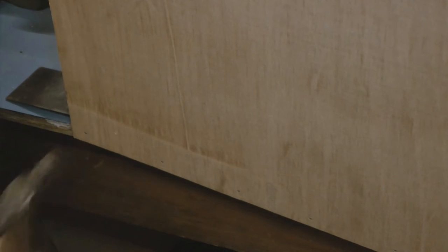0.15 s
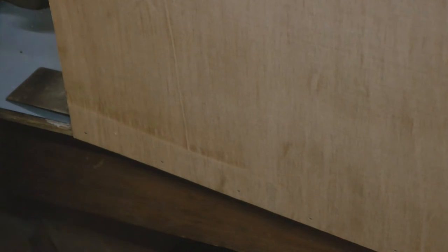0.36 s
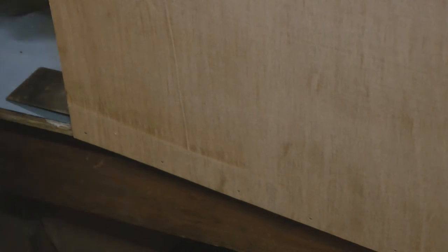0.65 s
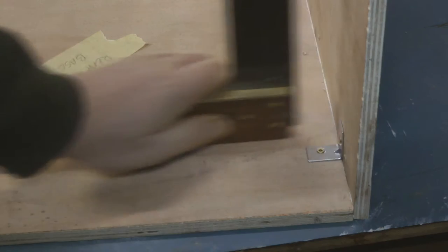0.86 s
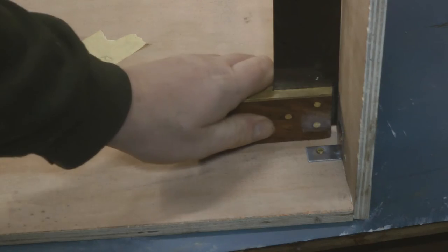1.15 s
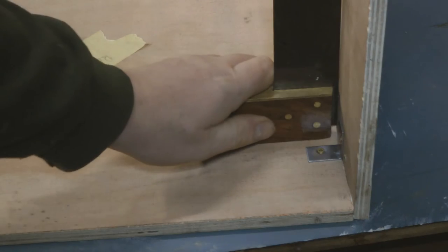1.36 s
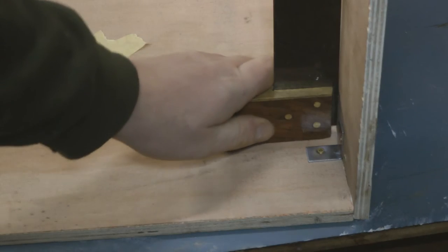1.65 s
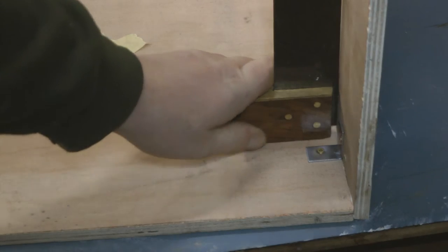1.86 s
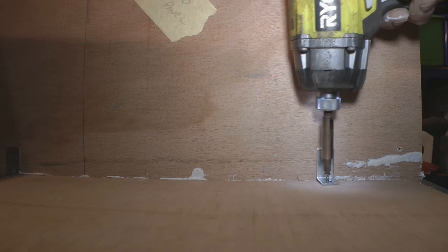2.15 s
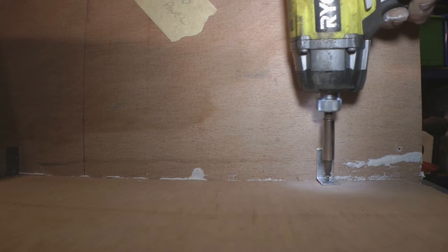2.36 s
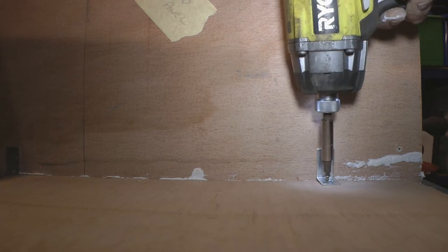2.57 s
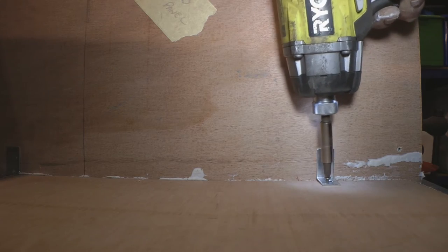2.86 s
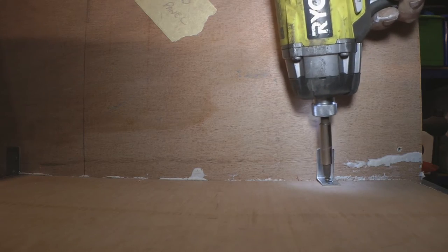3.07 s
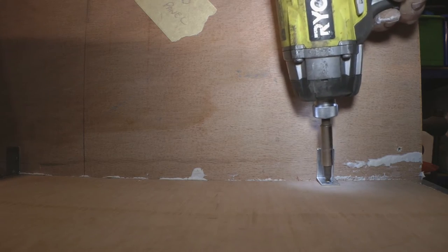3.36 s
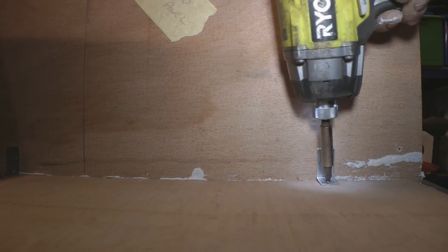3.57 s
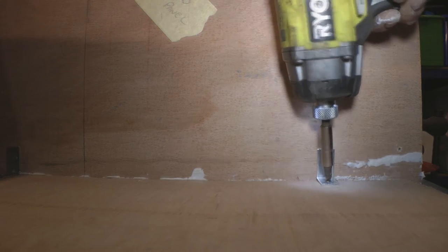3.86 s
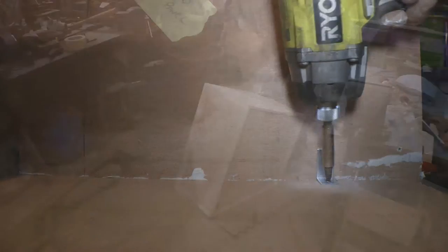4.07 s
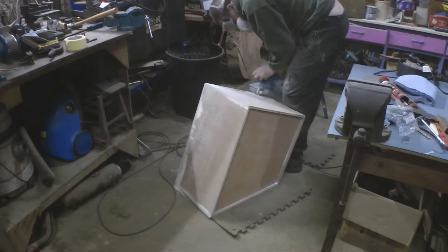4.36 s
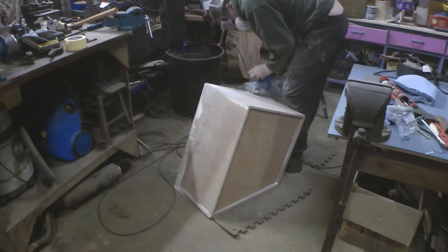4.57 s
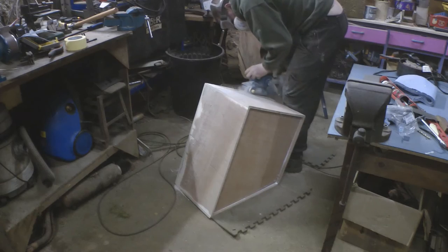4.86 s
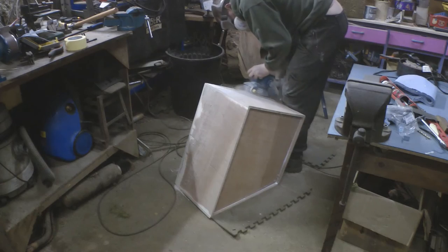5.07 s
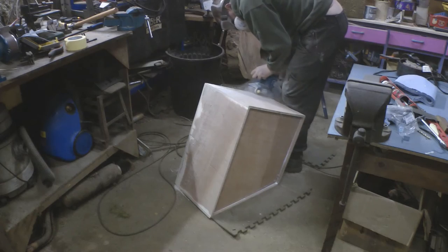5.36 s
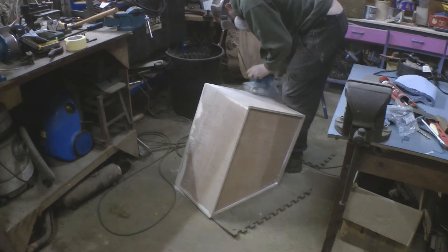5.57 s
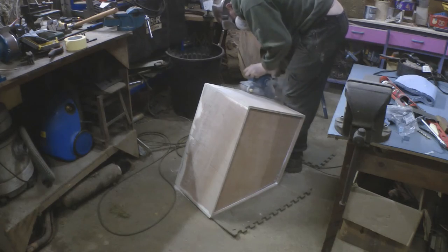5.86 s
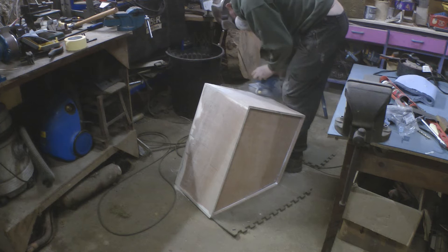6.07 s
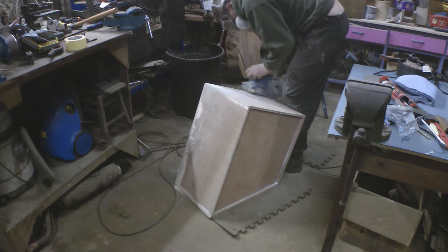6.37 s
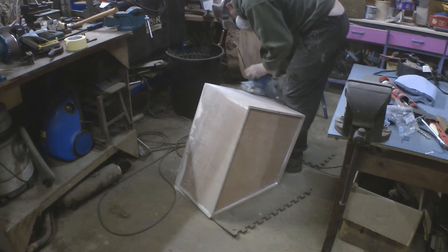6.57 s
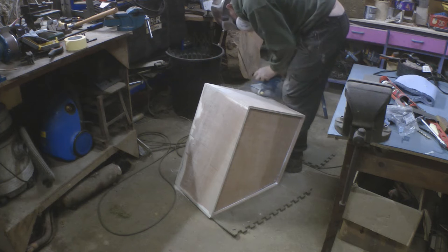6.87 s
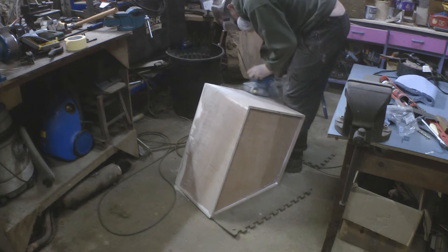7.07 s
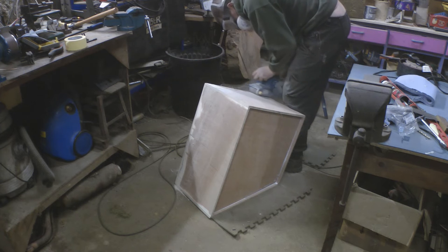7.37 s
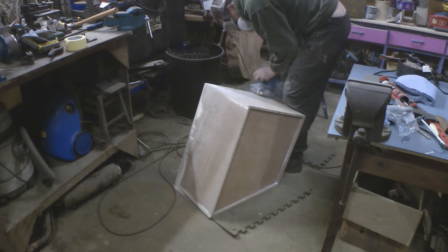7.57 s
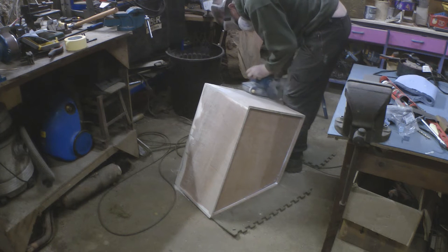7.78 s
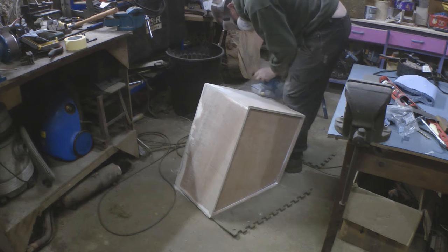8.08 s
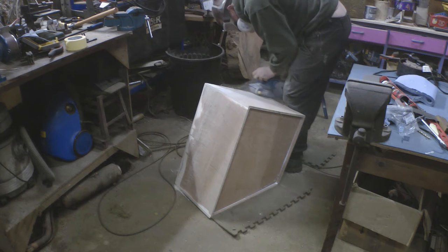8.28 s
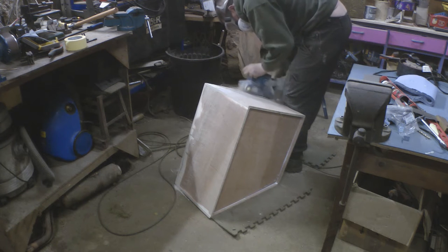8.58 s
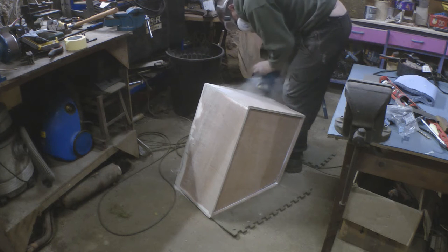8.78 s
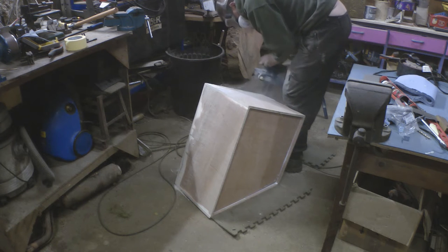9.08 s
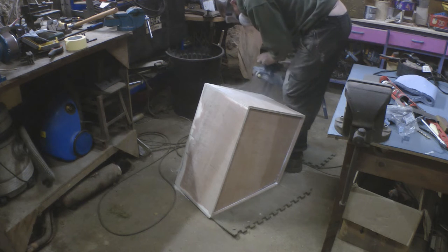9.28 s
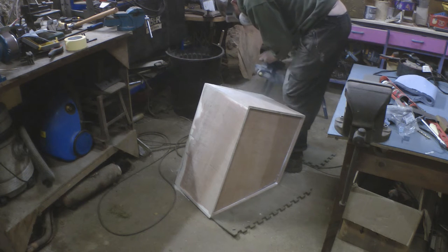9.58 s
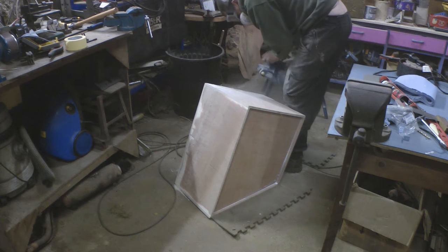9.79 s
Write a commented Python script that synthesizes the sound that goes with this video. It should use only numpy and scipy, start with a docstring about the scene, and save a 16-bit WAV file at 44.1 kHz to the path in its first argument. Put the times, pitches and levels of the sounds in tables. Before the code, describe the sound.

Two hammer blows on plywood among dry scrapes, then a cordless driver whirs and rattles, then a loud belt sander grinds, races and sinks.

```python
"""Plywood box building

In a small, cluttered workshop two hammer blows fall among scrapes: clicks excite decaying modes, noise slides.
A cordless driver grinds a screw home with gear noise, a rattling bit and a singing speed controller.
A belt sander works an edge, races free when lifted off and at the end is heard coasting, its pitch sinking:
its motor speed sets every tone."""
import sys
import numpy as np
from scipy import signal
from scipy.fft import rfft, irfft, next_fast_len
from scipy.io import wavfile

SR = 44100
rng = np.random.default_rng(int(sys.argv[2]) if len(sys.argv) > 2 else 0)


def digitize_waveform(pressure):
    """Quantize a signal to 16-bit integers and store it at the path in sys.argv[1].

    Rows of a 2-D input are taken as channels; values are limited to [-1, 1].
    """
    field = np.atleast_2d(pressure).T
    bounded = np.clip(field, -1, 1)
    quanta = np.round(bounded * 32767).astype(np.int16)
    wavfile.write(sys.argv[1], SR, quanta)


N = 437463
TIME = np.arange(N) / SR

# modes of the screw and bracket: (frequency [Hz], level [dB], t60 [s])
BIT_MODES = [(751, -7, 0.026), (1850, -4, 0.0057), (2254, -10, 0.011), (3090, 5, 0.007),
             (3700, 1.5, 0.0066), (3980, 3, 0.003)]
# modes of the box panels under the driver: (frequency [Hz], level [dB], t60 [s])
PANEL_MODES = [(112, -6, 0.4), (164, 0, 0.14), (202, 3, 0.11), (236, 4, 0.1), (285, -2, .07),
               (371, -12, 0.039)]
# modes of the box under the sander: (frequency [Hz], level [dB], t60 [s])
BOX_MODES = [(318, 4, 0.24), (372, 1, 0.09), (437, 6, 0.12), (473, 4, 0.09), (522, 3.5, 0.11),
             (821, -1, 0.12), (920, -1, 0.16), (1030, 2, 0.1)]

DRIVE_ATTACK_S, DRIVE_RELEASE_S = 0.028, 0.006
# the sander starts, meets the wood and is lifted off; from COASTING_S on it is heard already coasting
START_S, TOUCH_S, LIFT_S, COASTING_S = 4.105, 4.15, 8.81, 9.58


def from_db(db):
    """Logarithmic level: decibels to an amplitude ratio."""
    return 10 ** (np.asarray(db) / 20)


def rms_one(x):
    """Normalisation: the mean of the channels gets an rms of 1."""
    return x / np.sqrt(np.mean(np.atleast_2d(x).mean(axis=0) ** 2) + 1e-20)


def in_time(rows):
    """Linear interpolation: every column of a curve, sample by sample."""
    s, *columns = np.transpose(rows)
    return [np.interp(TIME, s, c) for c in columns]


def at_hz(points, hz):
    """Interpolation over log frequency: every column of a spectrum at the given frequencies."""
    f, *columns = np.transpose(points)
    return [np.interp(np.log(hz + 1), np.log(f), c) for c in columns]


def drift(rate_hz):
    """Low-passed random fluctuation: two equal real poles at rate_hz, rms 1."""
    step = 40  # samples between the points of the slow curve
    r = np.exp(-2 * np.pi * rate_hz * step / SR)
    slow = signal.lfilter([1], [1, -2 * r, r * r], rng.standard_normal(N // step + 2002))
    slow = rms_one(slow[2000:])  # the filter has settled by here
    return np.interp(np.arange(N) / step, np.arange(len(slow)), slow)


def pan(db):
    """Intensity stereo: left and right gains for a level difference, left minus right."""
    gains = from_db([[db / 2], [-db / 2]])
    return gains / gains.mean()


def noise(colour):
    """Partial coherence: coloured noise, mostly leaning right, whose channels are alike by frequency."""
    # across the two microphones: (frequency [Hz], left minus right [dB], likeness [0-1], phase [rad])
    stereo = [(60, 1, 0.81, -4), (160, 0.5, 0.45, 1.8), (310, -7.5, 0.9, -3.5), (564, -9, 0.94, -3.5),
              (1170, -5.5, 0.38, -5), (2270, -10, 0.48, -5.5), (4900, -16.5, 0.1, -5.5),
              (7940, -3.5, 0.14, -5.5), (14100, -15.5, 0.22, -31)]
    size = next_fast_len(N, real=True)
    hz = np.linspace(0, SR / 2, size // 2 + 1)
    lean_db, alike, turn = at_hz(stereo, hz)
    alike = np.clip(alike, 0, .98)
    mid, side = rfft(rng.standard_normal((2, size)))
    sides = np.array([[1], [-1]])
    pair = np.sqrt(1 + alike) * mid + sides * np.sqrt(1 - alike) * side
    pair = pair * from_db(sides * lean_db / 2)
    pair[0] *= np.exp(1j * turn)
    # the amplitude of the two channels' sum, divided out so that the colour holds at the centre
    centre = np.sqrt(from_db(lean_db) + from_db(-lean_db) + 2 * alike * np.cos(turn))
    return rms_one(irfft(pair / centre * from_db(at_hz(colour, hz)[0]))[:, :N])


def ring(clicks, modes):
    """Modal superposition: clicks excite a body's exponentially decaying resonances."""
    out = 0
    for hz, db, t60 in modes:
        r = from_db(-60 / (t60 * SR))  # decay per sample
        w = 2 * np.pi * hz / SR
        resonance = signal.lfilter([0, np.sin(w)], [1, -2 * r * np.cos(w), r * r], clicks + 1e-18)
        out = out + from_db(db) * resonance
    return out


def strike(s, db):
    """Impulsive force: one click."""
    click = np.zeros(N)
    click[round(s * SR)] = from_db(db)
    return click


def cut(x, hz, kind):
    """Second-order filtering: a gentle low- or high-pass."""
    sos = signal.butter(2, min(hz, SR / 2.2), kind, fs=SR, output="sos")
    return signal.sosfilt(sos, x + 1e-18)


def workshop(x, wet_db, lean_db):
    """Reverberation: direct sound plus dense decaying reflections, different at each microphone."""
    room_t60_s = 0.3
    t = TIME[:SR // 2]
    echoes = rng.standard_normal((2, len(t))) * from_db(-60 * t / room_t60_s)
    echoes *= t > .003  # the first reflection comes after 3 ms
    echoes *= from_db(wet_db) / np.sqrt(np.sum(echoes ** 2, axis=1, keepdims=True))
    reflected = signal.fftconvolve(x[None], echoes, axes=1)[:, :N]
    return pan(lean_db) * (x + reflected) / np.sqrt(1 + from_db(2 * wet_db) / 2)


def phase_of(hz, jitter, rate):
    """Phase as the integral of frequency: the angle of something that turns a little unevenly."""
    return 2 * np.pi * np.cumsum(hz * (1 + jitter * drift(rate))) / SR


def gate(start, end, attack_s, release_s):
    """Envelope: straight rise, hold, exponential release."""
    return np.clip((TIME - start) / attack_s, 0, 1) * np.exp(-np.clip((TIME - end) / release_s, 0, 40))


def each_turn(turns):
    """Periodic impulses: one click whenever a turn is completed."""
    return np.diff(np.floor(turns), prepend=np.floor(turns[0]))


def shaken(modes):
    """Random forcing of resonances: steady shaking keeps a wooden body ringing; rms 1."""
    white = noise([(1, 0)])
    return rms_one(cut(ring(white, modes), 115, "high"))


def room_floor():
    """Stationary background noise: a quiet room whose level rises by 7 dB shortly before the second blow."""
    # spectrum of the room: (frequency [Hz], level [dB])
    floor_colour = [(18, -78), (30, -51), (107, -16), (216, -15.5), (253, -14), (497, -22.5), (800, -24),
                    (1100, -37), (1410, -24), (6040, -36), (15000, -39.5)]
    rise_db = np.interp(TIME, [.85, .95], [-8, -1])
    return noise(floor_colour) * from_db(-60.5 + rise_db)


def sliding(grain_db=1.7):
    """Friction noise: hand and wood rub dryly over the plywood, stroke by stroke."""
    # the strokes: (start [s], end [s], level [dB])
    strokes = [(-0.1, 0.027, -41.5), (0.136, 0.214, -50), (0.502, 0.838, -56.5), (0.873, 1.075, -36.5),
               (1.447, 1.883, -65.5), (1.83, 1.934, -52)]
    # spectrum of the rubbing: (frequency [Hz], level [dB])
    slide_colour = [(35, -14), (60, -14), (355, -3), (480, -8), (1050, -8), (1520, -7.5), (2420, 3.5),
                    (4730, -3.5), (15000, -52)]
    attack_s, release_s = 0.11, 0.058
    level = sum(from_db(db) * gate(start, end, attack_s, release_s) for start, end, db in strokes)
    return level * from_db(grain_db * drift(56)) * noise(slide_colour)


def hammer(tail_t60=0.56):
    """Impact excitation: a chattering crack, a thump of the panel, ringing boards, then the room's tail."""
    # blows: (time [s], crack [dB], thump [dB], board ring [dB], room tail [dB], tail build-up [s],
    # contact cut-off [Hz])
    blows = [(0.1095, -16, -22.5, -50, -27, 0.026, 13100), (1.0990, -7.5, -17, -32, -27.5, 0.0022, 3550)]
    # the head chatters on the wood within one blow: (delay [s], level [dB], cut-off [Hz])
    rebounds = [(.0019, -1.5, 4060), (.0066, -11.5, 4000)]
    # modes of head on wood, of the plywood panel near the blow and of the box's boards:
    # each (frequency [Hz], level [dB], t60 [s])
    crack_modes = [(835, -7.5, 0.028), (1400, -21, 0.11), (1730, -16, 0.075), (2884, 0, 0.021),
                   (3880, -2.5, 0.014), (5070, 5.5, 0.0019), (6900, 7.5, 0.0016), (10140, 5, 0.0014),
                   (14500, -1, 0.0029)]
    thump_modes = [(70, -16, 0.077), (136, -2.5, 0.021), (258, -6, 0.015), (533, 4, 0.0078)]
    board_modes = [(254, -17, 2), (366, -16, .62), (420, -7, .42), (734, 0, .5), (803, -2, .3),
                   (804, -32, 5), (1227, -7, .5), (1393, -5, .4), (1690, -4, .41), (1841, -7, .24)]
    # the room after each blow, one spectrum a blow: (frequency [Hz], density [dB per Hz])
    tail_colours = [
        [(47, -47), (80, -28), (113, 10), (231, -45), (371, 7), (471, -52), (536, -8.5), (1720, 2), (2500, 2),
         (3440, 11.5), (14000, -46)],
        [(47, -39), (80, -20), (380, -2), (560, -19), (760, -10), (930, -20), (1190, -15), (2830, -4.5),
         (4650, -21.5), (7980, -73), (14000, -68)],
    ]
    out = 0
    for blow, colour in zip(blows, tail_colours):
        s, crack_db, thump_db, ring_db, tail_db, build_s, contact_hz = blow
        click = strike(s, 0)
        age = np.maximum(TIME - s, 0)
        contacts = click + sum(cut(strike(s + delay, db), hz, "low") for delay, db, hz in rebounds)
        crack = cut(cut(ring(contacts, crack_modes), contact_hz, "low"), 730, "high")
        out = out + pan(-12.0) * from_db(crack_db) * crack
        out = out + pan(4.7) * from_db(thump_db) * ring(click, thump_modes)
        out = out + pan(-18.0) * from_db(ring_db) * ring(click, board_modes)
        tail = from_db(tail_db - 60 * age / tail_t60) * (1 - np.exp(-age / build_s))
        out = out + noise(colour) * tail
    return out


def skid(s, db, length_s):
    """Random micro-impacts: a first touch, then a dying scatter of others."""
    clicks_per_s, scatter_db = 2100, -0.5
    age = TIME - s
    touches = (rng.random(N) < clicks_per_s / SR) * (age > 0) * rng.uniform(-0.98, 1, N)
    return strike(s, db) / 2 + touches * from_db(db + scatter_db) * np.exp(-np.clip(age / length_s, 0, 40))


def bumps():
    """Impact on resonant bodies: a tool slips or lands with a skid of steel and a boom of the box."""
    # the tools bump the box and skid: (time [s], panel [dB], click [dB], decay of the skid [s])
    knocks = [(2.314, -26, -34, 0.0081), (3.882, -40, -22.5, 0.018), (3.897, -27, -18.5, 0.005),
              (3.9088, -24, -45, 0.0086), (4.203, -28, -23, 0.01)]
    boom = ring(sum(strike(s, db) for s, db, _, _ in knocks), PANEL_MODES)
    boom = cut(boom, 93, "high")
    click = ring(sum(skid(s, db, length_s) for s, _, db, length_s in knocks), BIT_MODES)
    click = cut(click, 16000, "low")
    return workshop(boom, wet_db=-1.0, lean_db=-1.0) + workshop(click, wet_db=-13.0, lean_db=-11.5)


def controller(octave_db=-47, waver_db=3.5):
    """Frequency sweep: switched current sings in the driver's windings, a chirp a pull, then a sagging tone."""
    # each trigger pull sweeps the controller up: (start [s], end [s], start [Hz], top [Hz], chirp [dB])
    pulls = [(1.963, 2.765, 4690, 5640, -28), (2.77, 3.894, 3483, 5690, -16), (4, 4.133, 5550, 5620, -62)]
    # level of the switching tone before its waver: (time [s], level [dB])
    switching = [(2.0, -43), (2.25, -34), (2.45, -45), (2.6, -49), (2.8, -40), (3.5, -42), (3.7, -41),
                 (4.05, -45.5)]
    sweep_s, sag_hz_per_s = 0.006, 89  # half the sweep is done after sweep_s
    chirp_rise_s, chirp_fall_s = .003, .007
    hz, on, chirp = np.zeros(N), 0, 0
    for s, end, start_hz, top_hz, chirp_db in pulls:
        on = on + gate(s, end, DRIVE_ATTACK_S, DRIVE_RELEASE_S)
        age = np.maximum(TIME - s, 0)
        swept = top_hz - (top_hz - start_hz) / (1 + (age / sweep_s) ** 2)
        hz = np.where(TIME >= s, swept - sag_hz_per_s * age, hz)
        chirp = chirp + from_db(chirp_db) * gate(s, s + chirp_rise_s, chirp_rise_s, chirp_fall_s)
    angle = phase_of(hz, jitter=0.0028, rate=100)
    tone = from_db(in_time(switching)[0] + waver_db * drift(44)) * np.sin(angle)
    octave = from_db(octave_db + waver_db * drift(82)) * np.sin(2 * angle)
    return pan(-12.0) * on * (tone + octave) + workshop(chirp * np.sin(angle), wet_db=-6, lean_db=-12)


def driver(clicks_per_s=480, slowing=.75, easing=0.1, rasp_db=-0.5):
    """Repeated impact and forced vibration: gears rasp, the bit rattles in the screw head, the panel rumbles."""
    # the screw goes in by stages: (start [s], end [s], gear [dB], gear loss by the stage's end [dB],
    # bit chatter [dB], panel rumble [dB])
    drives = [(1.963, 2.309, -32, 1.5, -40, -40), (2.314, 2.774, -39, -5, -44, -47),
              (2.762, 3.898, -31.5, 14, -28, -45), (3.977, 4.124, -71, 1.5, -48, -43.5)]
    # the bit rides up in the screw head and rattles in a burst: (time [s], length [s], level [dB])
    bursts = [(2.143, 0.015, -25), (2.382, 0.011, -38), (2.414, 0.014, -36), (2.461, 0.016, -31),
              (2.549, 0.032, -33), (2.594, 0.027, -34), (2.724, 0.014, -31.5), (2.78, 0.028, -26.5),
              (2.838, 0.017, -23), (2.866, 0.0079, -26), (2.91, 0.028, -33), (2.957, 0.018, -25.4),
              (2.983, 0.017, -31), (3.025, 0.01, -27), (3.083, 0.0085, -21.5), (3.109, 0.015, -21),
              (3.162, 0.015, -40), (3.191, 0.014, -30), (3.236, 0.033, -26.4), (3.309, 0.028, -25),
              (3.343, 0.02, -25.2), (3.427, 0.02, -23), (3.527, 0.021, -20), (3.588, 0.042, -26),
              (3.661, 0.029, -27.5)]
    # the bit jumps with a single sharp tick: (time [s], level before the common tick_db [dB])
    tick_times = [(2.382, -13), (2.5704, -16), (2.6818, -18), (2.8014, -13), (2.8484, -12), (2.9714, -13),
                  (3.1956, -13), (3.313, -11.5), (3.3215, -12), (3.3977, -13.5), (3.5952, -13),
                  (3.6172, -13), (3.6903, -15), (3.7044, -14), (3.7218, -19), (3.7848, -15), (3.818, -13),
                  (3.8252, -17), (3.8477, -15), (3.8699, -14), (4.013, -33)]
    # spectrum of the gears: (frequency [Hz], level [dB])
    gear_colour = [(150, -62), (370, -13), (470, -27), (620, 1), (950, -10), (1400, -5.5), (1950, -4),
                   (2250, 1.5), (2520, -6), (3080, 4.5), (3520, -1.5), (4950, 0), (6100, -13), (6800, -7),
                   (9500, -15.5), (15500, -20)]
    tick_db, surge_attack_s, surge_release_s = -8, .004, .003
    gear = chatter = rumble = drag_db = 0
    for start, end, gear_db, loss_db, chatter_db, rumble_db in drives:
        on = gate(start, end, DRIVE_ATTACK_S, DRIVE_RELEASE_S)
        tight_db = loss_db * np.clip((TIME - start) / (end - start), 0, 1) ** 2
        gear = gear + on * from_db(gear_db - tight_db)
        chatter = chatter + on * from_db(chatter_db - easing * tight_db)
        rumble = rumble + on * from_db(rumble_db)
        drag_db = drag_db + on * tight_db
    # the rattle slows where the gears lose level and quickens where they gain
    angle = phase_of(clicks_per_s * from_db(-slowing * drag_db), jitter=.2, rate=150)
    force_db = 2 * np.clip(rng.standard_normal(N), -2, 1) + 1.5 * np.minimum(drift(50), 1)
    clicks = each_turn(angle / (2 * np.pi)) * from_db(force_db)
    # every touch lands elsewhere and so shares its force among the modes anew
    rattle = sum(ring(clicks * rng.uniform(.3, 1, N), [mode]) for mode in BIT_MODES)
    rattle = rms_one(cut(cut(rattle, 2530, "high"), 3500, "low"))
    surges = sum(from_db(db) * gate(s, s + length, surge_attack_s, surge_release_s)
                 for s, length, db in bursts)
    ticks = ring(sum(strike(s, db + tick_db) for s, db in tick_times), BIT_MODES)
    ticks = cut(cut(ticks, 1800, "high"), 2700, "low")
    bit = workshop(rattle * np.hypot(chatter, surges) + ticks, wet_db=-6, lean_db=-10.5)
    rasp = from_db(1.5 * drift(61) + rasp_db * np.cos(angle))
    return bit + gear * rasp * noise(gear_colour) + rumble * shaken(PANEL_MODES)


def motor_speed():
    """Exponential relaxation of a rotor: turns per second, and the load (0 free, 1 at working speed)."""
    # motor speed while the belt is on the wood: (time [s], speed [turns per s])
    held_speed = [(4.12, 501), (4.32, 497), (4.55, 485), (4.87, 460), (5.15, 460), (5.6, 464), (6.7, 461.5),
                  (7.25, 456.6), (8.1, 456.7), (8.62, 458.5), (8.76, 445)]
    free_speed, working_speed, coast_speed = 519, 457, 441  # turns per s
    spin_up_s, coast_s = .26, 1.38  # time constants
    held = in_time(held_speed)[0]
    # lifted, the motor races up to its free speed
    driven = free_speed - (free_speed - held) * np.exp(-np.maximum(TIME - LIFT_S, 0) / spin_up_s)
    # at COASTING_S the sound jumps to the sander already coasting down from coast_speed
    speed = np.where(TIME < COASTING_S, driven, coast_speed * np.exp((COASTING_S - TIME) / coast_s))
    load = (TIME < COASTING_S) * (free_speed - driven) / (free_speed - working_speed)
    return speed, load


def belt(speed):
    """Parametric forcing: the box flutters, harder as the seam comes round and chirps; a roller pulses beneath."""
    # modes of the sander's frame under its fluttering roller: (frequency [Hz], level [dB], t60 [s])
    frame_modes = [(120, 0, .06), (305, -1, .05)]
    turns_per_lap, roller_turns_per_lap = 40, 5  # motor turns and roller turns
    box_db, roller_db = -46, -63
    # once a lap the belt's seam slaps the wood and sends a falling chirp through the panel
    seam_place, seam_db, seam_s = .63, -50, .022  # place as a fraction of a lap
    seam_hz, seam_fall_hz_per_s = 300, 3600
    laps = np.cumsum(speed) / SR / turns_per_lap
    age = (laps - seam_place) % 1 * turns_per_lap / speed  # seconds since the seam passed
    slap = np.exp(-(age / seam_s) ** 2) * np.minimum(age / .003, 1)
    shaking = noise([(1, 0)]) * (1 + 1.8 * slap) * from_db(1.5 * drift(30))
    flutter = from_db(box_db) * rms_one(cut(ring(shaking, BOX_MODES), 290, "high"))
    seam_angle = 2 * np.pi * age * (seam_hz - seam_fall_hz_per_s * age / 2)
    chirp = from_db(seam_db + 2 * drift(9)) * slap * np.sin(seam_angle)
    pulse_db = 3 * drift(30) + 5 * np.cos(2 * np.pi * laps)
    roller = each_turn(laps * roller_turns_per_lap) * from_db(pulse_db)
    roller = from_db(roller_db) * rms_one(cut(ring(roller, frame_modes), 100, "high"))
    return flutter + pan(-8) * chirp + roller


def sander_tones(angle, contact, load, rough=0.22, coast_db=-7):
    """Rotational harmonics: multiples of the motor speed; some swell as the belt is pressed to the wood."""
    # three tones swell and fade as the tool moves: (time [s], third order [dB], sixth [dB], ninth [dB])
    tone_levels = [(4.2, -51, -34, -39), (4.5, -39.5, -26, -31), (4.85, -33, -31, -45),
                   (5.4, -35.5, -30, -37), (5.85, -34, -25.5, -36.5), (6.4, -33, -27.5, -34),
                   (6.8, -31.5, -26.5, -38), (7.05, -36.5, -33, -32.5), (8.6, -38.5, -31.5, -32),
                   (8.95, -41.5, -31.5, -41), (9.3, -36.5, -28, -39), (9.55, -30.5, -34, -55),
                   (9.62, -40, -28.5, -25.5), (9.9, -33, -27, -45)]
    # other motor tones: (multiple of motor speed, under load [dB], running free [dB])
    orders = [(1, -58, -46), (6.5, -43, -65), (11.5, -40, -65), (12.5, -41, -65)]
    twelfth_loaded_db, twelfth_free_db = -24.5, -49
    third_db, sixth_db, ninth_db = in_time(tone_levels)
    effort = contact * np.minimum(load, 1)
    coasting = TIME >= COASTING_S

    def tone(order, db, blur, fade=.42):
        """Phase modulation (blur [rad]) and interference: a shifting reflection adds to a tone or cancels it."""
        turn = order * angle + (blur + coasting) * drift(22.6)
        paths = (1 + fade * drift(5)) * np.sin(turn) + fade * drift(5) * np.cos(turn)
        return from_db(db) * (1 + rough * drift(140)) * paths

    tones = sum(tone(k, free + effort * (loaded - free), blur=.04 * k) for k, loaded, free in orders)
    tones = tones * from_db(coast_db * coasting)
    tones = tones + tone(3, third_db, blur=.45) + tone(6, sixth_db, blur=.25) + tone(9, ninth_db, blur=1.4)
    twelfth_db = twelfth_free_db + effort * (twelfth_loaded_db - twelfth_free_db)
    twelfth = tone(12, twelfth_db, blur=.25, fade=.12)
    return workshop(tones, wet_db=-9, lean_db=-10) + workshop(twelfth, wet_db=-13, lean_db=-16.5)


def sander_whine(speed, contact, load, loss_db, waver_db=3.0, coast_db=-5):
    """Slip: a thin whine near a multiple of motor speed; coasting, it weakens and its octave smears."""
    # the multiple running free, and what full load adds
    multiple, slip = 16.8, .162
    sanding_db, free_db, octave_db = -40, -29.5, -42.5
    angle = phase_of(speed * (multiple + slip * load), jitter=0.00061, rate=58.5)
    coasting = TIME >= COASTING_S
    db = contact * sanding_db + (1 - contact) * (free_db - 1.1 * loss_db) + coast_db * coasting
    smear = 1.2 * coasting * drift(150)  # radians
    octave_level = from_db(octave_db + 2.1 * coasting + waver_db * drift(8))
    octave = octave_level * np.sin(2 * angle + smear)
    whine = from_db(db + waver_db * drift(11.4)) * np.sin(angle)
    return workshop(whine + octave, wet_db=-12, lean_db=-6)


def sander(beat_depth=0.05, judder_db=1.5, start_s=0.11, touch_s=0.086, lift_s=0.07):
    """Loaded rotating machine: fan rush and motor tones; on the wood the grit tears and the belt shakes the box."""
    # spectra of the fan rush and of the grit on the wood: each (frequency [Hz], level [dB])
    air_colour = [(120, -62), (200, -45.5), (858, -8.5), (940, -11), (1210, -5.5), (1880, -5), (3120, 2),
                  (5010, -2), (8820, -17), (12000, -16), (14400, -23), (15500, -24)]
    cut_colour = [(40, -54), (110, -16), (190, -61), (330, -8.5), (700, -11.5), (1340, -5), (1650, -8),
                  (2200, -6.5), (2850, -3), (4700, -9), (5500, -8.5), (6300, -14), (9000, -23),
                  (15500, -22.5)]
    # the sander catches and jolts the box: (time [s], level [dB])
    catches = [(7.204, -37), (8.598, -41), (8.696, -38)]
    # fan rush running free, and what it loses under full load and when coasting
    fan_db, fan_load_loss_db, coast_loss_db = -24, 8.5, 2.5
    grit_db, grit_swing_db, box_rise_db_per_s = -29.5, 1.4, 2
    speed, load = motor_speed()
    contact = gate(TOUCH_S, LIFT_S - lift_s / 2, touch_s, lift_s)
    angle = phase_of(speed, jitter=0.001, rate=33)
    loss_db = fan_load_loss_db * load + coast_loss_db * (TIME >= COASTING_S)
    fan = noise(air_colour) * from_db(fan_db - loss_db + drift(8.7))
    # the tool judders along the wood and bites harder on every other turn
    judder = drift(6.5)
    bite = 1 + beat_depth * np.cos(angle / 2) + .2 * drift(140)
    grit = noise(cut_colour) * from_db(grit_db + grit_swing_db * judder) * bite
    box = belt(speed) * from_db(box_rise_db_per_s * (TIME - TOUCH_S) + judder_db * judder)
    jolts = ring(sum(strike(s, db) for s, db in catches), BOX_MODES)
    jolts = workshop(cut(cut(jolts, 260, "high"), 700, "low"), wet_db=-6, lean_db=-8)
    motor = fan + sander_tones(angle, contact, load) + sander_whine(speed, contact, load, loss_db)
    return np.clip((TIME - START_S) / start_s, 0, 1) * motor + contact * (grit + box + jolts)


def scene():
    """Linear superposition: all the work over a quiet room."""
    return room_floor() + sliding() + hammer() + bumps() + controller() + driver() + sander()


def record(dry):
    """Band limitation: a steep elliptic low-pass cuts the top at 15.9 kHz."""
    return signal.sosfilt(signal.ellip(12, .1, 90, 15900, fs=SR, output="sos"), dry)


dry = scene()
out = record(dry)
digitize_waveform(out)
```